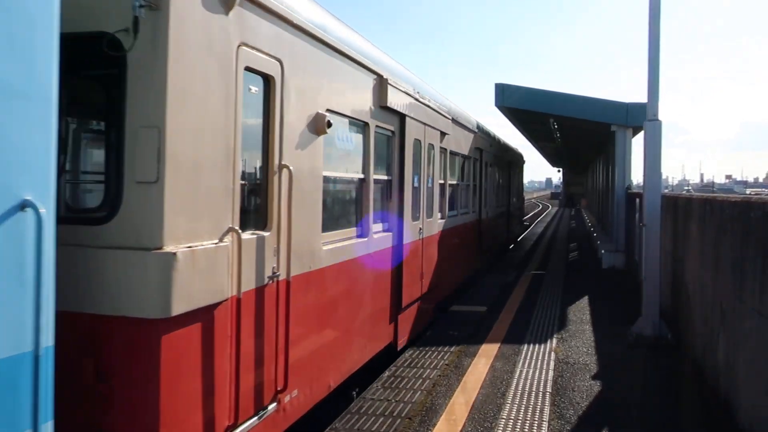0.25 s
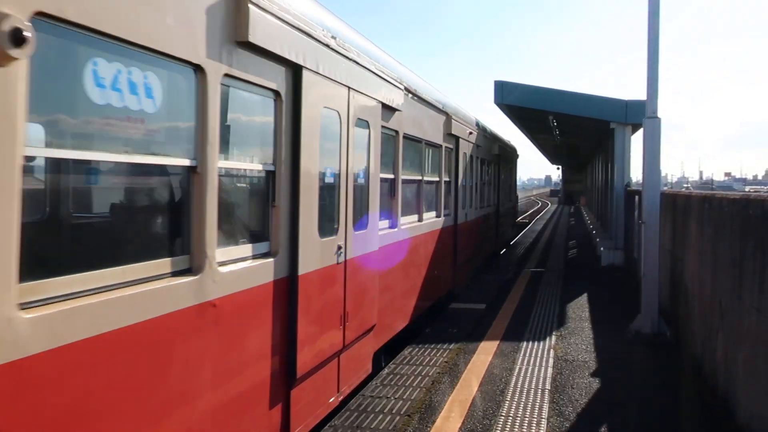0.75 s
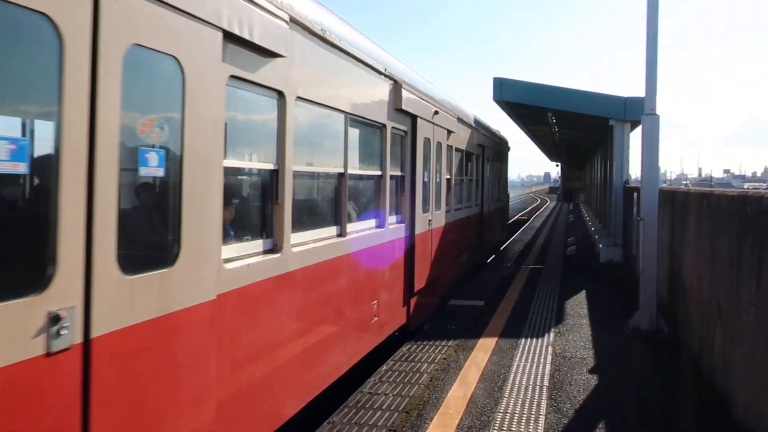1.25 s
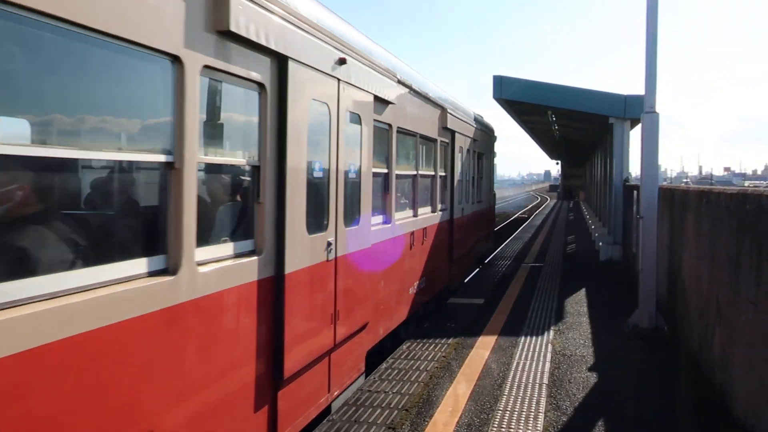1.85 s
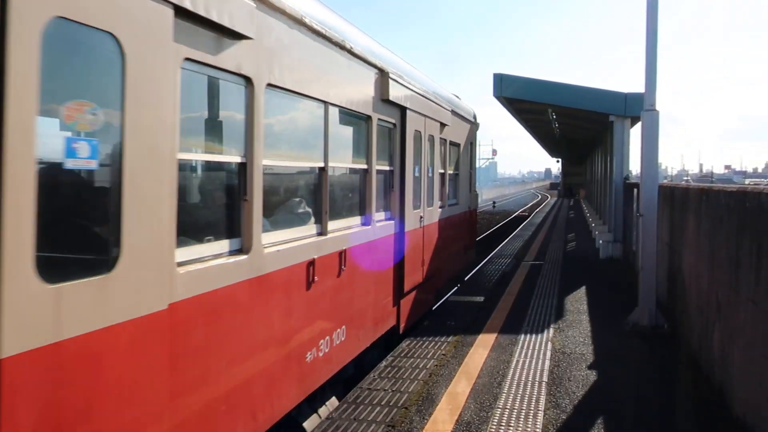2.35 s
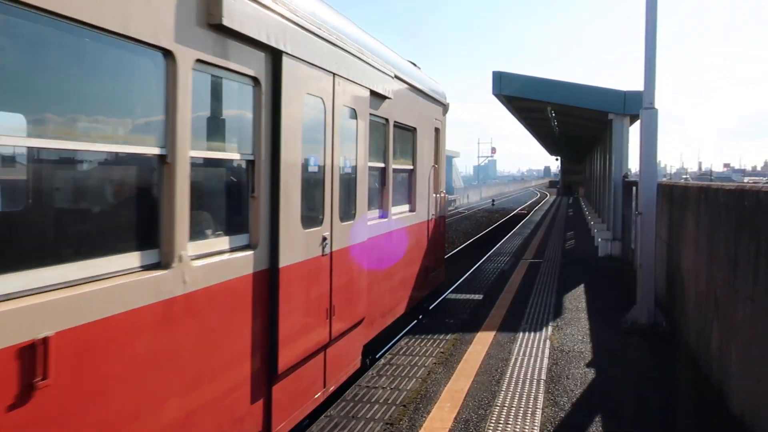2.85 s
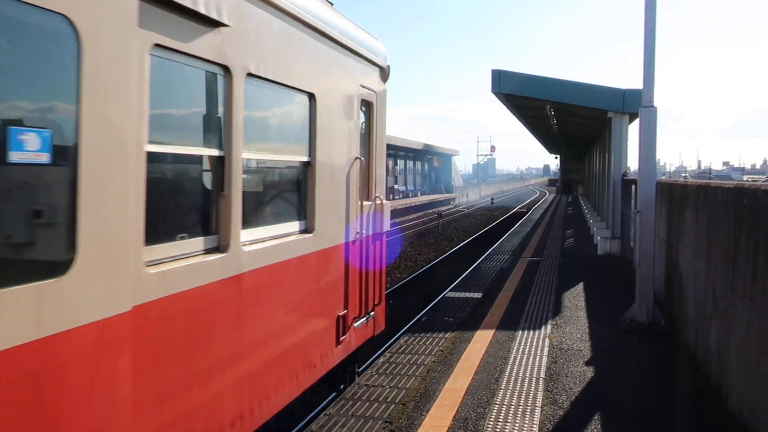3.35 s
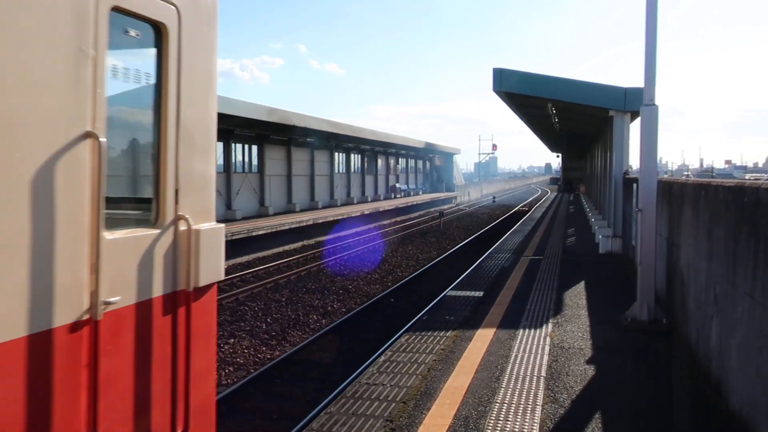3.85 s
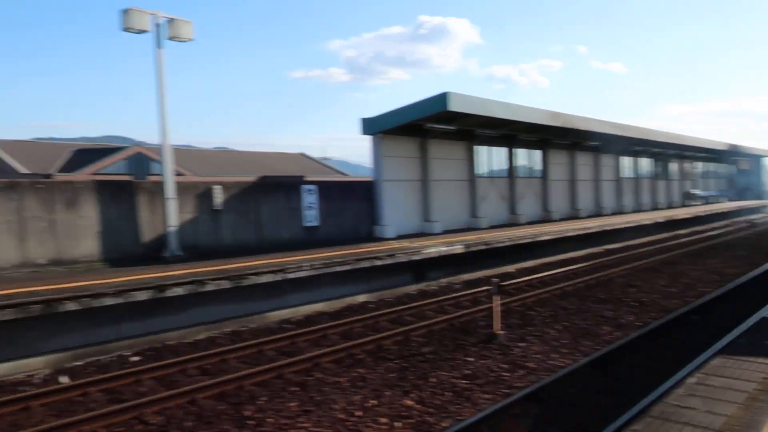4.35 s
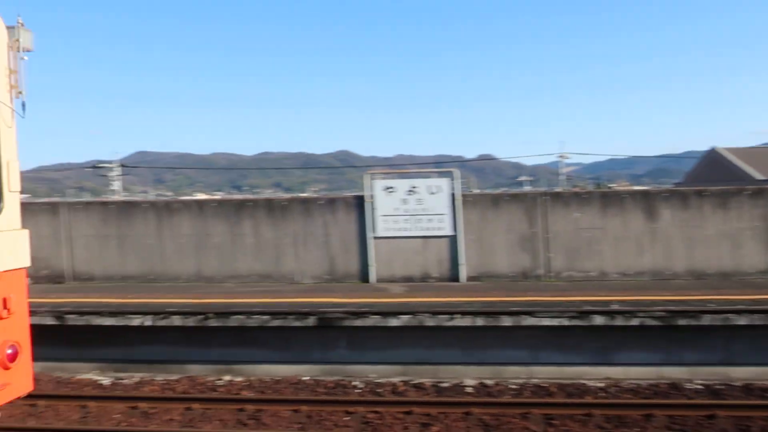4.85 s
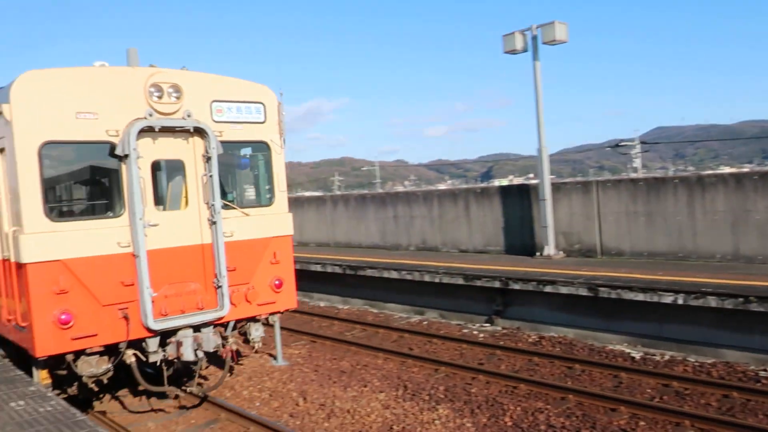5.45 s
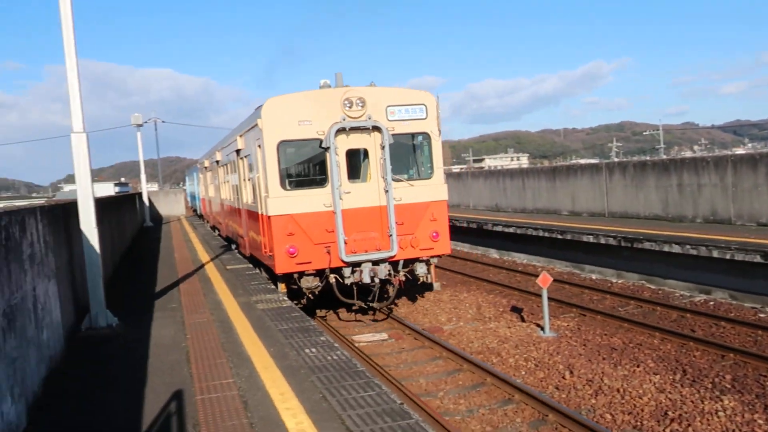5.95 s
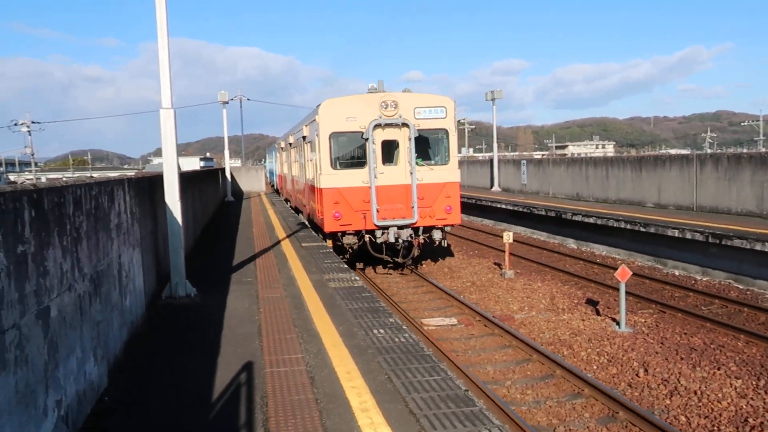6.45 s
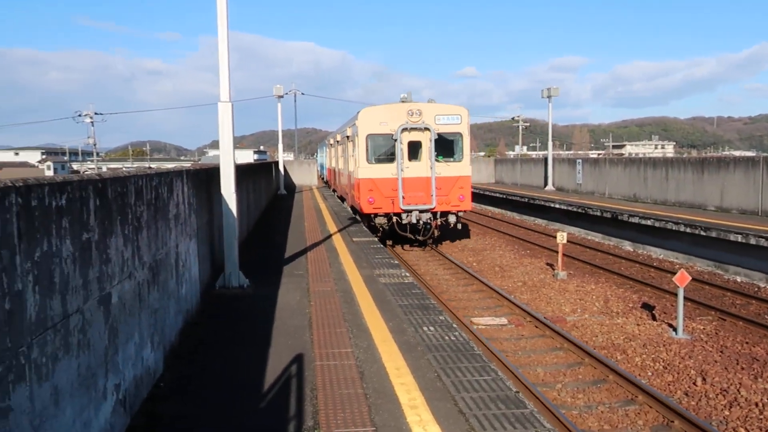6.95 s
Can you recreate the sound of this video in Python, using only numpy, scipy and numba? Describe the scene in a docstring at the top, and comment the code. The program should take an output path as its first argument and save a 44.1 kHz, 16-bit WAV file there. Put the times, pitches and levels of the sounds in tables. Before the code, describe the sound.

Old diesel railcars roll close past a platform with droning engines, hiss and whine, then draw away as wind pops against the microphone.

```python
"""Diesel railcars roll past a small stereo camera on a platform and draw away: six-cylinder engines drone as
tones on multiples of the engine cycle over firing-pumped noise. Resonant noise bands make rings and hiss,
the turbocharger whine, howls, a sinking hum and a grainy rattle. Gusts and pops buffet the microphone
ports; late on, the camera's wind filter cuts the bass of everything."""
import sys
import numpy as np
from scipy import signal
from scipy.fft import rfft, irfft, next_fast_len
from scipy.io import wavfile
from scipy.ndimage import uniform_filter1d
from numba import njit

SR = 44100
rng = np.random.default_rng(int(sys.argv[2]) if len(sys.argv) > 2 else 0)


def materialize(psi):
    """Save the field psi as 16-bit PCM at rate SR to the path in sys.argv[1].

    A 1-D psi becomes a single channel; in a 2-D psi each row is a channel.
    """
    bounded = np.clip(np.atleast_2d(psi).T, -1, 1)
    quanta = np.round(bounded * 32767).astype(np.int16)
    wavfile.write(sys.argv[1], SR, quanta)


N = 317520
FFT_SIZE = next_fast_len(N)
TIME = np.arange(N) / SR  # s
HZ = np.arange(FFT_SIZE // 2 + 1) * SR / FFT_SIZE


def undb(db):
    """Amplitude ratio of a level in dB."""
    return 10 ** (np.asarray(db) / 20)


def unit(x):
    """Scale to an RMS of 1."""
    return x / np.sqrt(np.mean(x ** 2))


def curves(table):
    """Columns after the time column, interpolated over TIME."""
    s, *columns = np.transpose(table)
    return [np.interp(TIME, s, c) for c in columns]


def colour(table, hz):
    """Spectrum in dB, interpolated over log frequency."""
    f, db = np.transpose(table)
    return np.interp(np.log(hz + 1), np.log(f), db)


def shaped(gain):
    """Noise with the given gain at each of HZ."""
    spectrum = rfft(rng.standard_normal(FFT_SIZE))
    return irfft(gain * spectrum, FFT_SIZE)[:N]


def walk(rate_hz):
    """Random levels held 1 / rate_hz, slewed twice, RMS near 1."""
    hold = int(SR / rate_hz)
    steps = np.repeat(rng.standard_normal(N // hold + 1), hold)
    slewed = uniform_filter1d(uniform_filter1d(steps, hold), hold)
    return unit(slewed[:N])


def butter(x, hz, kind, order):
    """Butterworth filter."""
    return signal.sosfilt(signal.butter(order, hz, kind, fs=SR, output="sos"), x)


@njit
def svf(x, hz, k):
    """State-variable band-pass with a moving centre; k is width over centre."""
    y, band, low = np.empty(len(x)), 0., 0.
    for i in range(len(x)):
        g = np.tan(np.pi * hz[i] / SR)
        v = (band + g * (x[i] - low)) / (1 + g * (g + k))
        band, low, y[i] = 2 * v - band, low + 2 * g * v, k * v
    return y


def narrow(hz, k):
    """Noise through a moving resonance twice; k is width over centre of one pass."""
    return unit(svf(svf(rng.standard_normal(N), hz, k), hz, k))


def swell_db(rows):
    """Gaussian rises and falls, summed in dB."""
    return sum(db * np.exp(-((TIME - s) / half) ** 2) for s, half, db in rows)


# Level curves of the train noise, 0 about the usual level.
# Each row: time in seconds, bass, treble, top in dB.
LEVEL_CURVES = [(0, -1, 1.5, -11), (.85, 0, -2, 2.5), (1.0, 0, 0.5, 6), (1.1, -3, -4, 3), (1.4, 1, 0, 2),
                (1.52, 0, -4.5, 3), (2.25, 0.5, -1, 4.5), (2.75, 0, 0.6, 3), (2.96, -2.5, -3, -14),
                (3.43, 2, -4, -27), (3.5, -0.5, -5.5, -19), (4.7, -3.5, -7, -17.5), (5.2, -1.5, -2.5, -9.5),
                (5.9, 0, -0.4, 2.5), (6.04, -2, -6.5, 2.5), (6.08, -2, -8.5, -1), (6.25, -2, -14, 1),
                (6.3, -13.5, -16, 1), (6.9, -13.5, -11, 2.5), (7.2, -10.5, -8.5, 3)]
# Camera comes round to face the tail of the train: start and end in seconds.
SWING_S = (4.52, 6.02)


def follow_db(db, bass, treble, top, swung_db):
    """Layer level: shares of the level curves plus the change as the camera swings."""
    shared_db = np.dot((bass, treble, top), curves(LEVEL_CURVES))
    return db + shared_db + np.interp(TIME, SWING_S, (0, swung_db))


# Gusts on the ports. Each row: start in seconds, length in seconds,
# level in dB before the mid and side shares, eddy pitch in Hz.
GUSTS = [(1.048, .093, -20, 286), (1.197, 0.043, -37, 247), (1.35, 0.069, -31, 179),
         (1.442, .12, -21.5, 257), (1.971, .11, -33, 210.6), (2.33, .12, -26.5, 150), (2.54, .17, -37, 212),
         (3.472, 0.09, -28, 253), (3.79, .11, -32, 247), (4.011, .09, -30, 223), (4.43, 0.26, -22, 268),
         (4.9, .083, -28, 258), (5.04, .16, -24.5, 239), (5.3, .29, -29.5, 235), (5.93, 0.21, -27, 194.5),
         (6.171, 0.075, -17.5, 327), (6.265, .105, -23.5, 422), (6.37, .066, -19.5, 400),
         (6.436, .085, -21.5, 380), (6.52, .075, -25.5, 340), (6.09, .07, -26, 201),
         (6.93, 0.033, -29, 300), (7.01, 0.034, -32, 297)]
# Patchy breeze between the gusts, same reference. Each row: time in seconds, level in dB.
BREEZE = [(.8, -53), (1.0, -40), (1.8, -50), (2.5, -36.5), (3.1, -47), (3.6, -35.5), (4.25, -50.5),
          (5.0, -40.5), (5.9, -33.5), (6.6, -41)]
# Sharp pops. Each row: start in seconds, level in dB, pitch in Hz, side over mid as a ratio (minus = right).
POPS = [(5.866, -20, 169.6, 2.5), (5.948, -12, 130, -1), (6.026, -7.5, 152, 0.4), (6.047, -3.5, 172, 0.1),
        (6.113, -14, 327, -1.5), (6.156, -8.5, 252, 0.7), (6.179, -10, 300, 2.3), (6.204, -9, 300, 1.6),
        (6.225, -14, 230, 0.6), (6.233, -6.5, 196, -0.5), (6.298, -19, 420, 3), (6.391, -8.5, 416, 2),
        (6.416, -14.5, 594, 2.5), (6.452, -20.5, 404, 4), (6.499, -15.5, 385, 0.69), (7.017, -18, 318, 2)]
BREEZE_PATCHY_DB = 5
POP_RISE_CYCLES, POP_FADE_CYCLES, POP_TOP_HZ = 0.25, 0.83, 2300
# Crack relative to its pop, for a pop at CRACK_POP_HZ; CRACK_S is the half length.
CRACK_DB, CRACK_S, CRACK_BAND_HZ, CRACK_POP_HZ = -19.5, 0.0029, (850, 2050), 450


def pop_pair():
    """Mid and side pops: a decaying thump, with a crack one cycle in that grows as pitch squared."""
    pops = np.zeros((2, N))
    hiss = unit(butter(rng.standard_normal(N), CRACK_BAND_HZ, "band", order=2))
    for s, db, pitch_hz, side in POPS:
        span = slice(int(s * SR), int(s * SR) + 2000)
        since = np.maximum(TIME[span] - s, 0)
        cycles = since * pitch_hz
        envelope = np.tanh(cycles / POP_RISE_CYCLES) * np.exp(-cycles / POP_FADE_CYCLES)
        thump = 2 * np.sin(2 * np.pi * cycles) * envelope
        burst = np.exp(-((since - 1 / pitch_hz) / CRACK_S) ** 2)
        crack = undb(CRACK_DB) * (pitch_hz / CRACK_POP_HZ) ** 2 * hiss[span] * burst
        pops[:, span] += np.array([[1], [side]]) * undb(db) * (thump + crack)
    return butter(pops, POP_TOP_HZ, "low", order=4)


def wind():
    """Eddies burst on the ports: scattered pressure kicks, resonant over a thud, unlike in mid and side."""
    hz = np.interp(TIME, [g[0] + g[1] / 2 for g in GUSTS], [g[3] for g in GUSTS])
    gusts = np.zeros(N)
    for s, length, db, _ in GUSTS:
        gusts[int(s * SR):int((s + length) * SR)] += undb(db)
    breeze = undb(curves(BREEZE)[0] + BREEZE_PATCHY_DB * walk(10))
    gain = uniform_filter1d(gusts, int(0.0076 * SR)) + breeze
    out = []
    for share_db, pop in zip((-6.5, -.1), pop_pair()):
        struck = rng.random(N) < 3500 / SR  # mean 3500 kicks per second
        kicks = struck * rng.standard_normal(N) * undb(1.9 * rng.exponential(size=N))
        eddies = unit(butter(svf(kicks, hz, 0.55), 680, "low", order=3))
        thud = unit(butter(kicks, [65, 150], "band", order=3))
        out.append(undb(share_db) * gain * unit(eddies + undb(-7) * thud) + pop)
    return np.array(out)


RATTLE_BAND_HZ, RATTLE_DB, RATTLE_FLICKER_DB = (950, 3300), -35.5, 4
RATTLE_TILT_DB = -8  # per octave


def rattle():
    """Grainy rattle: flickering, drifting narrow bands of noise that follow the treble curve."""
    low_hz, high_hz = RATTLE_BAND_HZ
    parts = 0
    for octave in np.linspace(0, np.log2(high_hz / low_hz), num=14):
        level = undb(RATTLE_TILT_DB * octave + RATTLE_FLICKER_DB * walk(16))
        parts = parts + level * narrow(low_hz * 2 ** (octave + .04 * walk(3)), .045)
    return unit(parts) * undb(follow_db(RATTLE_DB, 0, 0.88, 0, 1.7))


# Glides as bogies go by, one table per howl. Each row: time in seconds, pitch in Hz, level in dB.
HOWLS = [
    [(3.1, 367, -56), (3.3, 379.2, -26), (3.7, 395.4, -29), (4.1, 413, -35), (4.4, 404, -46)],
    [(1.95, 780, -50), (2.2, 840, -33), (2.37, 825, -25), (2.5, 820, -32), (2.65, 787, -27),
     (2.8, 761, -25), (3.0, 746, -47)],
    [(4.85, 1760, -52), (5.15, 1610, -35), (5.5, 1725, -42), (5.7, 1580, -41), (5.82, 1590, -31),
     (5.87, 1590, -36), (5.93, 1580, -32), (6.05, 1590, -55)],
    [(0, 1270, -50), (.15, 1267, -30), (.35, 1300, -44), (.5, 1300, -53)],
]


def howl():
    """Breathy gliding tones: narrow resonances of noise, each sounding only within its table."""
    out = 0
    for table in HOWLS:
        hz, db = curves(table)
        sounding = (TIME > table[0][0]) * (TIME < table[-1][0])
        out = out + undb(db + 1.5 * walk(18)) * sounding * narrow(hz, 0.04)
    return out


# Sinks as the last engine goes by. Each row: time in seconds, centre in Hz, level in dB.
HUM = [(2.1, 239, -50), (2.4, 232, -29), (2.9, 205.5, -26.5), (3.4, 175, -24.5), (4.1, 150, -27.5),
       (4.7, 138, -29), (5.1, 134.4, -50)]


def hum():
    """A rough, wide, sinking resonance of noise."""
    hz, db = curves(HUM)
    return undb(db) * narrow(hz, .3)


# Resonant noise bands, from narrow rings to broad hiss, in groups.
# Each row: centre in Hz, width of one filter pass in Hz, level in dB within the group.
RING_BANDS = [
    [(229.6, 69, -.1)],
    [(388.4, 80, -.1)],
    [(741, 51, 0.5), (827.6, 86, -2), (659.3, 60, -3)],
    [(1569, 160, 0), (1727, 110, -5.5)],
    [(2137, 170, -5.5), (2423, 110, -1.5), (3305, 850, -1.5)],
    [(2730, 300, -.1)],
    [(5200, 1300, -.1)],
    [(593, 180, -.1)],
    [(1053, 260, -.1)],
]
# Each row is one group: usual level in dB, share of bass, of treble, of top, change once swung in dB.
RING_LEVELS = [(-28.5, 0.45, 0.18, 0.01, -11), (-32, 0.63, 0.61, 0.0026, -4),
               (-28.5, 0.068, 0.75, 0.00014, -2.5), (-36.5, 0.016, 0.7, 0.0034, 2),
               (-46, 0.021, 1, 0.0091, 11), (-51.5, 0.02, 0.9, 0.0078, 10.5), (-61, 0.052, 0.96, 0.03, 2.5),
               (-39.5, 0.46, 0.43, 0.002, -6), (-44, .05, 1, 0.0034, 4.5)]
# Each row: group index (only whole indices of a group sound), peak in seconds, half length in seconds,
# swell in dB.
RING_SWELLS = [(7, 5.15, 0.28, 6.5), (4.5, 5.95, 0.11, 2), (3, 5.95, 0.12, 3.5), (9.5, 5.4, .2, 2),
               (7, 3, .3, 4), (7, 4.4, 0.36, 4.5), (0, 0.49, 0.67, 3.5), (0, 2.33, 0.095, 2.5),
               (0, 2.93, .3, 8), (0.5, 3.55, .2, 3), (1, 3.5, 0.44, -1.5), (1, 6.8, .4, -7),
               (3, .4, 0.23, 0), (2, 1.2, 0.23, 3.5), (1, 4.3, 0.63, 9), (2, 1.84, .4, 5.5),
               (2, 2.34, 0.13, 5), (2, 2.56, 0.13, 3.5), (3, 2.5, .35, 2), (4, 5.1, 0.33, 3.5),
               (5, 5.1, .35, 5), (7, 3.8, 0.6, 8), (7, 2.3, 0.34, 5), (6, 6, .3, 3), (6, 5.6, 0.35, 0),
               (4, 5.8, .2, 0), (5, 4.85, 0.082, 7), (5, 3.3, 0.23, 7), (3, 3.34, 0.29, 3.5),
               (3, 5.15, 0.12, 2), (4, 5, .25, -0.5), (4, 0.18, 0.47, 6)]
RING_DRIFT = .012  # RMS wander as a share of pitch


def rings():
    """Noise through drifting resonances, from narrow rings to broad hiss; each group swells on its own."""
    out = 0
    for k, (bands, row) in enumerate(zip(RING_BANDS, RING_LEVELS)):
        db = follow_db(*row) + swell_db(swell[1:] for swell in RING_SWELLS if swell[0] == k)
        group = 0
        for hz, width_hz, band_db in bands:
            ring = narrow(hz * (1 + RING_DRIFT * walk(4)), width_hz / hz)
            group = group + undb(band_db + 1.7 * walk(12)) * ring
        out = out + undb(db) * unit(group)
    return out


# Each row: time in seconds, whine pitch in Hz, whine level in the side in dB, intake hiss level in dB.
TURBO = [(0, 5720, -56, -47), (.7, 5780, -53, -51), (1.6, 5860, -50.5, -52), (2.2, 5880, -49.5, -48),
         (2.75, 5860, -42.5, -45), (3.3, 5830, -54, -46.5), (3.7, 5790, -53, -49), (4.5, 5820, -54, -53),
         (5.0, 5860, -56, -54.5), (5.9, 5850, -63, -53), (6.3, 5800, -80, -65), (7.2, 5700, -81, -61)]
# Intake hiss colour. Each row: frequency in Hz, relative level in dB per Hz.
INTAKE_COLOUR = [(3500, -25), (5000, 0), (7000, -1), (10000, -4), (14500, -9)]
OVERTONE = 1.51  # times the whine pitch


def turbo():
    """Mid and side of a breathy whine; intake hiss and a fainter upper whine are in the side alone."""
    hz, whine_db, hiss_db = curves(TURBO)
    hz = hz * (1 + .003 * walk(15))
    whine = undb(whine_db + 2.5 * walk(25))
    hiss = unit(shaped(undb(colour(INTAKE_COLOUR, HZ)))) * undb(hiss_db + .7 * walk(8))
    high = undb(-10) * narrow(OVERTONE * hz, .04)
    mid = undb(-3.0) * whine * narrow(hz, 0.028)
    side = whine * (narrow(hz, .016) + high) + hiss
    return np.array([mid, side])


# Borders of the noise layers in Hz.
LAYER_EDGES_HZ = (15, 110, 260, 550, 1100, 2800, 6900, 10000)
# Each row is one layer: usual mid level in dB, share of bass, of treble, of top, change once swung in dB.
LAYER_LEVELS = [(-28, 0.93, 0.098, 0.042, 3.5), (-21, 1.11, 0, 0.031, -2.5), (-22, 0.38, 0.5, 0.019, -6.5),
                (-25.5, 0.11, 1.24, 0.012, -0.5), (-29, 0.19, 0.95, 0.081, 0), (-40, 0, 0.97, 0.1, -1),
                (-62.5, 0.3, 0.77, 1, 3.5)]
# Noise colour within the layers. Each row: frequency in Hz, relative level in dB per Hz.
BODY_COLOUR = [(15, -40.5), (25, -23.5), (65, -9.5), (140, -7.5), (216, -6), (324, -7.5), (430, -9.5),
               (560, -15), (900, -15), (1250, -22.5), (2000, -25.5), (3230, -36.5), (5500, -47),
               (9400, -62.5)]
# Width of the noise. Each row: frequency in Hz, side minus mid in dB.
NOISE_WIDTH = [(60, -32), (150, -65), (400, -67.5), (800, -45.5), (1600, -3), (2400, -9), (4000, 1.5),
               (7000, 1.5)]
# Surges of the low rumble. Each row: peak in seconds, half length in seconds, swell in dB.
SURGES = [(.14, 0.073, 12), (1.05, 0.13, 10), (1.56, 0.17, 5), (2.3, 0.28, 5.5), (2.62, 0.072, -2),
          (3.43, 0.094, 4), (3.66, 0.086, 3), (4.13, 0.17, 14), (4.93, 0.08, 6), (5.45, 0.33, 7),
          (5.85, 0.36, 0.5)]
SURGE_IN_BOOM = 0.12  # share of the surges, in dB, in the second layer


def train_noise(turn):
    """Seven layers of flickering noise bands, pumped by six uneven firings per engine cycle."""
    firings = 6 * turn
    uneven = undb(5.2 * rng.standard_normal(N // 400))[firings.astype(int)]  # one strength per firing
    puff = 2 * uneven * np.sin(np.pi * (firings % 1)) ** 2
    pumped = [0.041, 0.11, 0.14, 0.053, 0.05, 0.03, .03]  # pumped share of each layer
    levels = np.array([follow_db(*row) for row in LAYER_LEVELS])
    levels[:2] += np.outer((1, SURGE_IN_BOOM), swell_db(SURGES))
    octave = np.log2(HZ + 1)
    judder = walk(14)  # common to all bands
    body, width = undb(colour(BODY_COLOUR, HZ)), undb(colour(NOISE_WIDTH, HZ))
    out = 0
    for k, db in enumerate(levels):
        lo, hi = np.log2(LAYER_EDGES_HZ[k]), np.log2(LAYER_EDGES_HZ[k + 1])
        count = max(int(2 * (hi - lo)), 2)
        step = (hi - lo) / count
        layer = 0
        for centre in lo + step * (np.arange(count) + .5):
            band = np.cos(np.pi / 2 * np.clip((octave - centre) / step, -1, 1)) * body
            pair = np.array([shaped(band), shaped(band * width)])  # mid, side
            layer = layer + pair * undb(0.82 * walk(2.996) + 1.22 * walk(11) + 0.47 * judder)
        layer = layer * (1 + pumped[k] * (puff - 1))
        out = out + layer * undb(db) / np.sqrt(np.mean(layer[0] ** 2))
    return out


# Engine cycles per second. Each row: time in seconds, rate in Hz.
ENGINE_CYCLE = [(0, 11.42), (.7, 11.44), (1.5, 11.52), (2.5, 11.6), (3.3, 11.55), (4.2, 11.57),
                (5.2, 11.43), (7.2, 11.48)]
# Tones as multiples of the engine cycle.
ORDERS = (2, 3, 4, 6, 8, 10, 12, 13, 15, 18, 20, 21)
# Usual level of each multiple in dB.
DRONE_DB = (-42, -38.5, -32, -28, -34.5, -38.5, -28, -41, -34.5, -27.5, -38.5, -44.5)
# Tones swell or fade as an exhaust moves by.
# Each row: multiple, peak in seconds, half length in seconds, swell in dB.
TONE_SWELLS = [(10, 1.6, 0.47, 10), (10, 2.25, 0.25, 11.5), (10, 4.3, 0.2, 8.5), (10, 4.53, .3, 11),
               (10, 6.05, 0.18, 13), (13, 2.9, 0.18, 7), (13, 3.3, 0.51, 17.5), (20, 2.38, 0.16, 15),
               (20, 2.97, 0.32, 17.5), (21, 2.34, 0.17, 18), (21, 2.3, 0.14, 10), (12, 2.75, 0.15, 6.5),
               (4, 2.5, 0.36, 8), (4, 4.6, 0.31, 9.5), (6, 0.7, 0.28, 1), (6, 4.2, 0.52, 4),
               (6, 5.35, 0.57, 6.5), (8, 0.67, 0.77, 9.5), (8, 1.8, 0.33, 7.5), (8, 5.7, 0.41, 7),
               (8, 5.5, 0.27, 9), (12, 0.55, 0.35, 5), (12, 1.8, 0.31, -4.5), (12, 4.1, 0.68, 5),
               (12, 4.235, 0.36, 9), (12, 4.844, 0.27, 11), (12, 5.96, 0.19, 6), (12, 6.9, 0.63, 7.5),
               (15, 6.9, 0.56, 9), (6, 1.2, 0.48, 0), (2, 4.7, 0.96, 10), (3, 4, 1.2, 9.5),
               (15, 2.01, 0.36, 11), (15, 2.725, 0.26, 8), (15, 3.35, 0.47, 19.5), (15, 3.76, .15, 6),
               (15, 4.5, 0.23, 17), (15, 5.5, 0.75, 10), (18, 1.46, 0.27, 5.5), (18, 1.816, 0.33, 9.5),
               (18, 1.1, 0.3, -1.5), (6, 4.65, .15, -7), (6, 4.6, 0.075, 3.5), (18, 2.83, 0.31, 9),
               (18, 3.37, .3, 3.5), (18, 3.95, 0.4, 7.5), (18, 6.95, 0.4, -9), (18, 6.8, 0.36, -12)]
DRONE_BASS_SHARE = 1.14


def drone():
    """Sine tones on multiples of the engine cycle, wavering a little; also gives the cycle phase."""
    turn = np.cumsum(curves(ENGINE_CYCLE)[0] * (1 + 0.002 * walk(6.5))) / SR
    tones = 0
    for k, usual_db in zip(ORDERS, DRONE_DB):
        swells = swell_db(row[1:] for row in TONE_SWELLS if row[0] == k)
        db = follow_db(usual_db, DRONE_BASS_SHARE, 0, 0, 0) + swells
        sine = np.sin(2 * np.pi * (k * turn + rng.random()))
        tones = tones + undb(db + 1.5 * walk(11)) * np.sqrt(2) * sine
    return tones, turn


def scene():
    """Left and right of the train and wind; the train is placed to the left."""
    tones, turn = drone()
    mid, side = train_noise(turn) + turbo()
    mid = mid + tones + rings() + howl() + hum() + rattle()
    presence = 0.21 * butter(mid, [1000, 7000], "band", order=1)  # louder on the left
    lead = 0.2 * np.gradient(mid)  # a touch earlier on the left
    side = side + presence + lead
    gust_mid, gust_side = wind()
    mid, side = mid + gust_mid, side + gust_side
    return np.array([mid + side, mid - side])


FILTER_S, FILTER_FADE_S = 6.255, 0.0048  # middle and length of the cut-in
FILTER_HZ, FILTER_LEAK_DB = 136, -20.5
SUM_TOP_HZ, TOP_HZ = 8800, 14600


def record(dry):
    """The wind filter cuts the bass and folds the lower range to mono; peaks soften and the top is cut."""
    mid, side = (dry[0] + dry[1]) / 2, (dry[0] - dry[1]) / 2
    on = np.clip((TIME - FILTER_S) / FILTER_FADE_S + .5, 0, 1)
    cut_mid = butter(mid, FILTER_HZ, "high", order=4) + undb(FILTER_LEAK_DB) * mid
    mid = (1 - on) * mid + on * cut_mid
    side = (1 - on) * side + on * butter(side, 1900, "high", order=2)
    # the middle of the stereo picture is dull above SUM_TOP_HZ
    mid = signal.sosfilt(signal.ellip(6, .2, 45, SUM_TOP_HZ, fs=SR, output="sos"), mid)
    out = np.tanh(1.06 * np.array([mid + side, mid - side])) / 1.08
    return signal.sosfilt(signal.ellip(8, .2, 70, TOP_HZ, fs=SR, output="sos"), out)


dry = scene()
out = record(dry)
materialize(out)
```